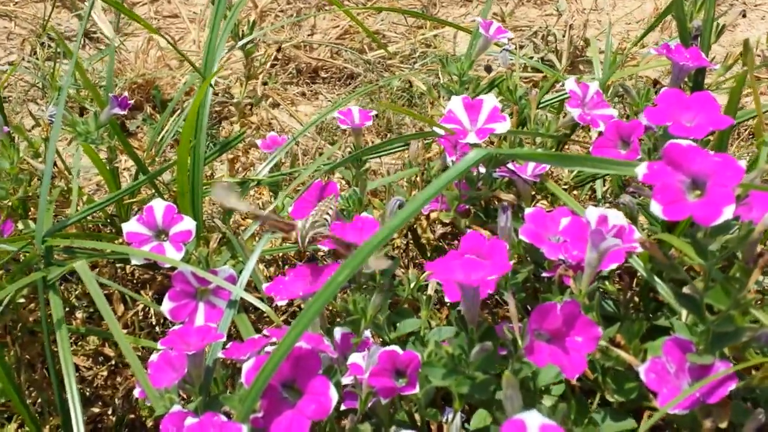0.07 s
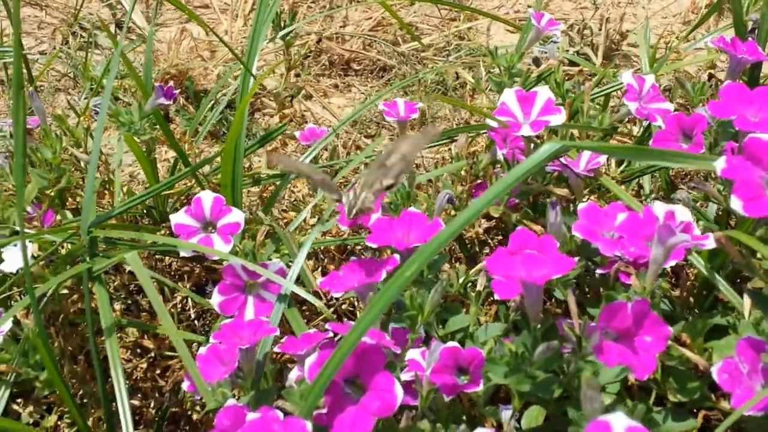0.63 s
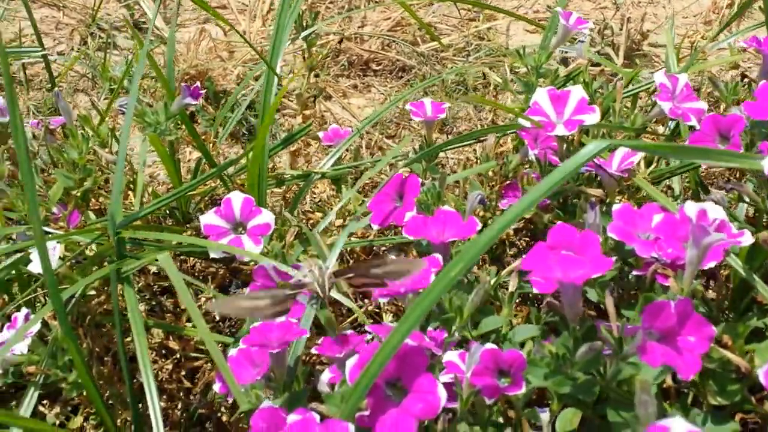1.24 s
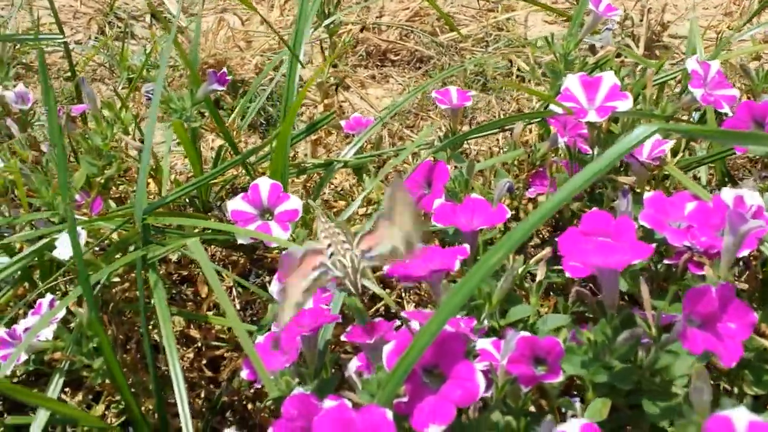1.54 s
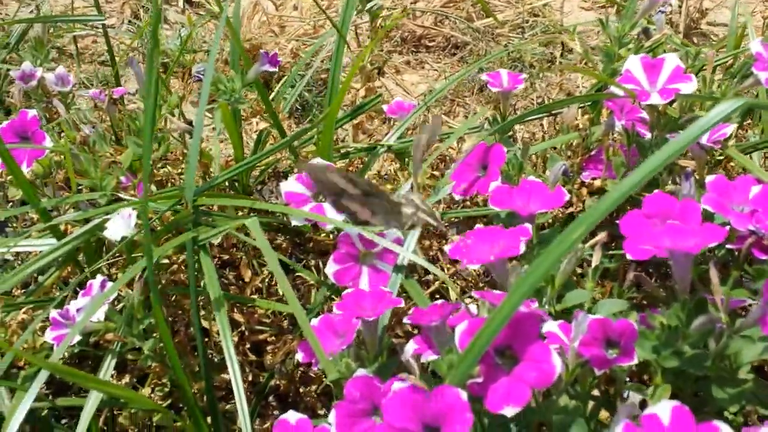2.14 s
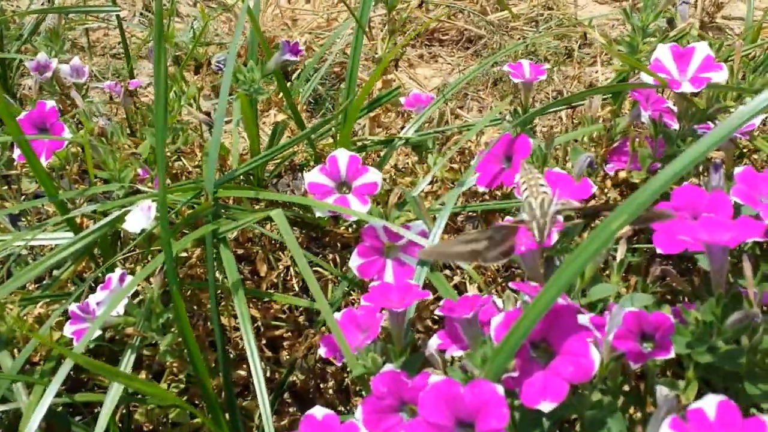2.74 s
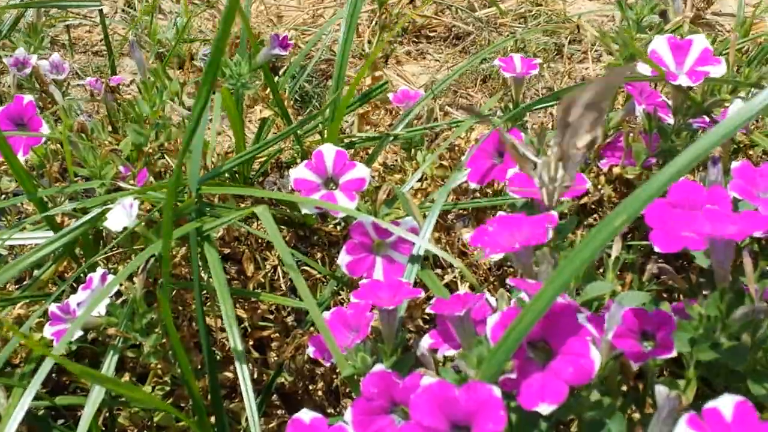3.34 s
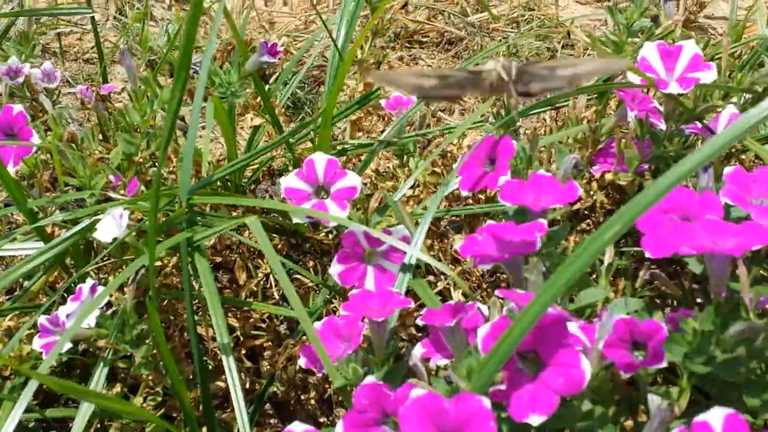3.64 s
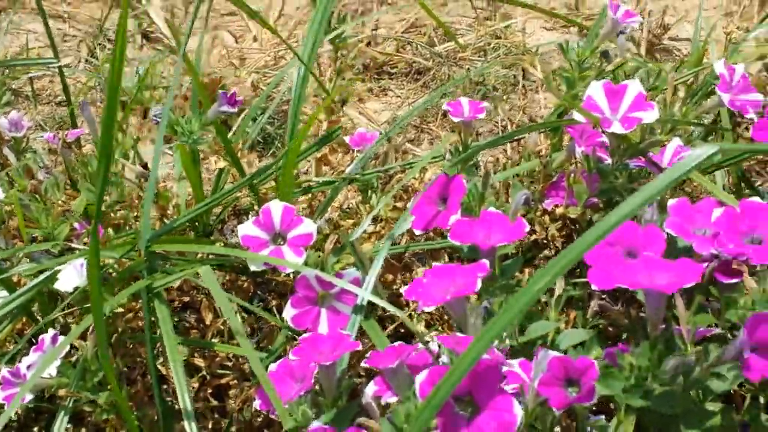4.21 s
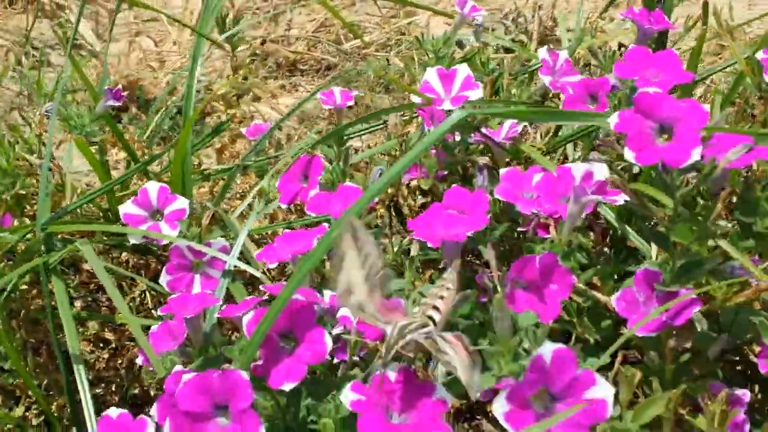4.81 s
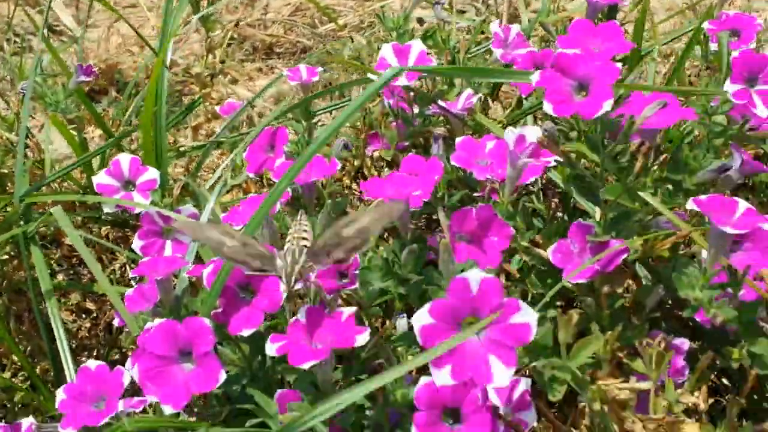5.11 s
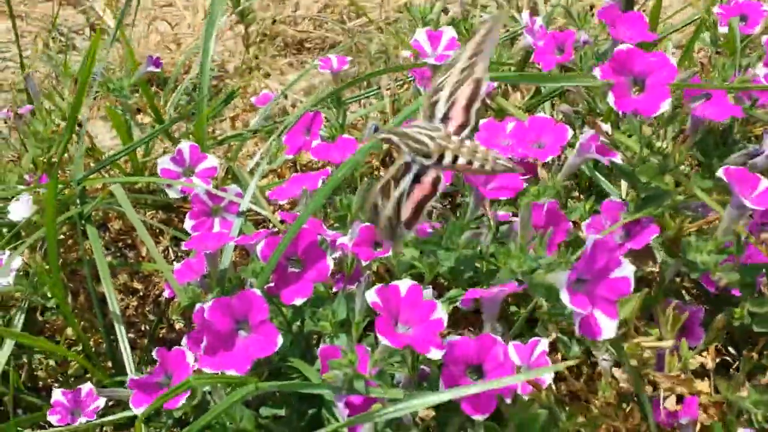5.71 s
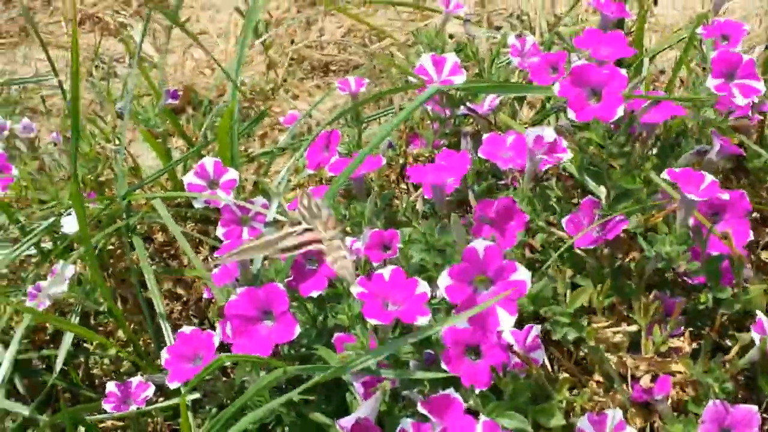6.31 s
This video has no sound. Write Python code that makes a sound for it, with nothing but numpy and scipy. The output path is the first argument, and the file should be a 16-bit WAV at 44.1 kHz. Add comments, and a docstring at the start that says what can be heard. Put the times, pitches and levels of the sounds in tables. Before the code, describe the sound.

A soft breeze and a faint, high hiss of insects in dry grass run throughout, slightly to the left, with a barely audible distant hum. Wind on the hand-held microphone is the loudest sound. It is light at first, then hits suddenly at about 1.3 seconds with low rumbles and thuds that shift between left and right. It dips briefly, returns at 2 seconds and continues in smaller, uneven puffs. From about 4.5 seconds it builds, buffeting hardest between 5.4 and 6 seconds. Tiny dry clicks sound close by, scattered through the first three seconds, with a sharper one near 3.9 seconds. Fingers tap dully on the housing at about 0.9 and 1.7 seconds. The insects swell slightly around 2 and 5 seconds. From about 5.7 seconds a very faint, thin, distant whistle rises on one pitch, fading at the end, near 6.4 seconds.

```python
"""Wind buffets the two ports of a hand-held microphone, each with its own eddies, strongest near the end.
Each eddy is a pressure pulse that the bass roll-off turns into a thud. Insects stridulate in dry grass,
three bands of hiss over a soft breeze and a faint distant hum. Small dry clicks ring close by,
fingers tap the housing twice, and a thin far whistle swells late."""
import sys
import numpy as np
from scipy import signal
from scipy.fft import rfft, irfft, next_fast_len
from scipy.io import wavfile
from scipy.ndimage import uniform_filter1d, map_coordinates

SR = 44100
rng = np.random.default_rng(int(sys.argv[2]) if len(sys.argv) > 2 else 0)


def to_wav(sig):
    """Store sig (one row per channel, or 1-D mono) as 16-bit WAV at the path in sys.argv[1].

    Samples outside -1..1 are clipped; the rate is SR.
    """
    pcm = np.clip(np.atleast_2d(sig), -1, 1) * 32767
    pcm = np.round(pcm).astype(np.int16)
    wavfile.write(sys.argv[1], SR, pcm.T)  # frames by channels


N = 280476


def amp(db):
    """Decibels to gain."""
    return 10 ** (np.asarray(db) / 20)


def unit(x):
    """Each channel at rms 1."""
    return x / np.sqrt(np.mean(x ** 2, axis=-1, keepdims=True) + 1e-20)


def power(x, size=1250):
    """Running mean square."""
    return np.abs(uniform_filter1d(uniform_filter1d(x * x, size), size)) + 1e-12


def pan(left_db):
    """Channel gains for a left-minus-right level."""
    return amp([[left_db / 2], [-left_db / 2]])


def over_hz(points, hz):
    """(f/Hz, value) points interpolated on a log axis."""
    knots_hz, values = np.transpose(points)
    return np.interp(np.log(hz + 1), np.log(knots_hz + 1), values)


def over_time(points):
    """(t/s, value) points interpolated per sample."""
    return np.interp(np.arange(N) / SR, *np.transpose(points))


def wobble(rate_hz):
    """Smooth random curve, rate_hz knots a second."""
    knots = rng.standard_normal(int(N * rate_hz / SR) + 4)
    return map_coordinates(knots, [np.arange(N) * rate_hz / SR])


def filtered(x, response):
    """x through a complex frequency response."""
    size = next_fast_len(N + SR // 2)
    return irfft(rfft(x, size) * response(np.fft.rfftfreq(size, 1 / SR)), size)[..., :N]


def resonances(modes, hz):
    """Causal response of (f/Hz, width/Hz, level/dB) modes, alternating in sign."""
    return sum((-1) ** k * amp(db) * 1j * hz * width / (centre ** 2 - hz ** 2 + 1j * hz * width)
               for k, (centre, width, db) in enumerate(modes))


def hiss(spectrum, patchy_db=1.56):
    """Uncorrelated stereo noise of rms 1, shimmering in small time-frequency patches."""
    cells = signal.stft(rng.standard_normal((2, N)), nperseg=1024)[2]
    patches = uniform_filter1d(rng.standard_normal(cells.shape), size=5, axis=1)
    patches = uniform_filter1d(patches, size=7, axis=2)
    noise = signal.istft(cells * amp(patchy_db * patches / patches.std()), nperseg=1024)[1][:, :N]
    return unit(filtered(noise, lambda hz: amp(over_hz(spectrum, hz))))


def pulses(times_s, peaks, half_widths_ms):
    """Bell-shaped pressure pulses; narrow ones sound brighter."""
    offsets = np.arange(-SR // 40, SR // 40)
    distance = offsets / (np.asarray(half_widths_ms)[:, None] * SR / 1000)
    bells = np.asarray(peaks)[:, None] * np.hanning(len(offsets)) / (1 + distance ** 2)
    at = np.round(np.asarray(times_s)[:, None] * SR).astype(int) + offsets
    inside = (at >= 0) & (at < N)
    return np.bincount(at[inside], bells[inside], N)


def low_cut(x, corner_hz=92, damping=1.0, blocking_hz=38):
    """Microphone bass roll-off: each push becomes a swing and a rebound."""
    def response(hz):
        s = 1j * hz / corner_hz
        return s * s / (s * s + damping * s + 1) * 1j * hz / (1j * hz + blocking_hz)
    return filtered(x, response)


# Wind rumble before the port offset: t/s, level/dB
WIND_DB = [(0, -51.5), (.25, -40.5), (.7, -45), (1.22, -48), (1.28, -24.5), (1.58, -31), (1.87, -45),
           (1.97, -26), (2.55, -33), (3.1, -33.5), (3.38, -35), (3.8, -37), (4.1, -32.5), (4.7, -26.5),
           (5.2, -21.5), (5.9, -19.5), (6.03, -23.5), (6.36, -25)]
# Port offset, left in the lee: port -> gain/dB
PORT_DB = {"L": -9, "R": 1}
# Air stalls at both ports: t/s, half length/s, drop/dB
WIND_LULLS = [(3.18, 0.02, 7), (3.375, .04, 10), (3.952, 0.014, 5), (4.888, 0.009, 16), (5.611, 0.019, 8.5),
              (6.17, 0.03, 1.5)]
# Puffs at one port: start t/s, port, hold/s, level/dB
WIND_PUFFS = [(0.28, "L", 0.1, -39), (0.446, "L", 0.016, -29.5), (1.258, "R", 0.058, -18.5),
              (1.274, "L", .12, -21.5), (1.447, "L", 0.018, -20.5), (1.529, "L", 0.11, -19),
              (1.958, "R", .04, -22), (2.092, "L", 0.02, -19), (2.187, "R", 0.017, -19.5),
              (2.334, "R", 0.085, -26), (2.436, "L", 0.062, -26.5), (2.571, "L", 0.17, -30.5),
              (2.678, "R", 0.035, -25), (2.97, "R", 0.12, -27.5), (3.06, "L", 0.1, -32.5),
              (3.292, "R", 0.043, -30), (3.46, "R", 0.023, -28), (3.479, "L", 0.098, -31.5),
              (3.69, "R", 0.063, -30), (3.853, "R", 0.078, -22), (3.99, "L", .14, -29.5),
              (4.204, "L", 0.027, -25.5), (4.303, "L", 0.13, -33.5), (4.472, "R", 0.034, -23.5),
              (4.682, "L", 0.058, -17), (4.809, "R", 0.049, -15.5), (4.913, "L", 0.031, -28),
              (5.217, "L", 0.048, -19.5), (5.375, "L", 0.066, -23), (5.445, "L", .115, -15.5),
              (5.643, "R", 0.18, -15.5), (5.668, "L", .145, -16), (5.853, "L", 0.058, -12),
              (5.927, "L", 0.082, -18.5), (6.241, "L", 0.039, -17)]

def airflow_db(port, flutter_db=2.5, flutter_hz=30, attack_s=0.019, release_s=0.026):
    """Rumble level at one port: fluttering wind with lulls, overtaken by puffs."""
    t = np.arange(N) / SR
    lull_db = sum(drop_db / (1 + ((t - at_s) / half_s) ** 4) for at_s, half_s, drop_db in WIND_LULLS)
    level_db = over_time(WIND_DB) + PORT_DB[port] + flutter_db * wobble(flutter_hz) - lull_db
    for start_s, side, hold_s, puff_db in WIND_PUFFS:
        if side == port:
            outside = np.maximum((start_s - t) / attack_s, (t - start_s - hold_s) / release_s)
            level_db = np.maximum(level_db, puff_db - 20 * np.maximum(outside, 0))
    return level_db


def turbulence(level_db, buffets, rate_hz=420, half_ms=2.546, narrowing=0.033, scatter=0.21, calm_db=-30):
    """Random eddies: faster air makes them stronger and shorter."""
    count = int(rate_hz * N / SR)
    jitter, spread, peaks = rng.standard_normal((count, 3)).T
    times_s = np.clip((np.arange(count) + jitter) / rate_hz, 0, (N - 1) / SR)
    speed_db = np.maximum(level_db[(times_s * SR).astype(int)] - calm_db, -7)
    half_widths_ms = half_ms * np.exp(scatter * spread - narrowing * speed_db)
    stream = low_cut(pulses(times_s, peaks, half_widths_ms))
    gust_power = amp(level_db) ** 2
    stream_power = np.maximum(gust_power - power(buffets), 0.5 * gust_power)
    return stream * np.sqrt(stream_power / power(stream))


# Hardest eddies: t/s, port, level/dB before the low cut, half width/ms
HARD_EDDIES = [(1.275, "R", -7.5, 0.78), (1.294, "L", -0.5, 2.3), (1.33, "R", -12.5, 0.81),
               (1.359, "L", -7, 1.27), (1.423, "R", -11.5, 0.85), (1.55, "L", -0.5, 2.3),
               (1.617, "L", -4.5, 0.9), (1.983, "R", -13, 0.89), (2.098, "L", 3, 5.1),
               (2.188, "R", -7.5, 1.14), (2.337, "R", -14, 1.27), (2.46, "L", -9.5, 1.36),
               (2.688, "R", -11.5, 1.6), (3.882, "R", -8.5, 0.93), (4.486, "R", -9.5, .96),
               (4.678, "L", 1, 2.1), (4.837, "R", 2, 2.7), (5.111, "R", -3, 1.06), (5.252, "R", -2, 0.79),
               (5.286, "R", -11, 0.78), (5.450, "L", 1.5, 1.2), (5.462, "L", 0.5, 1), (5.494, "L", 1, 0.98),
               (5.667, "L", -0.5, 1.07), (5.754, "L", -2, 1.02), (5.860, "L", 1, 0.69),
               (5.891, "L", 1.5, 0.81), (5.991, "L", -0.5, 1.2), (6.210, "R", -8, 0.79)]

def wind(port):
    """Hard eddies thud on one port amid the smaller turbulence."""
    rows = [(at_s, db, half_ms) for at_s, side, db, half_ms in HARD_EDDIES if side == port]
    times_s, levels_db, half_widths_ms = np.transpose(rows)
    buffets = low_cut(pulses(times_s, -amp(levels_db), half_widths_ms))
    return buffets + turbulence(airflow_db(port), buffets)


# Effort of the whole chorus: t/s, gain/dB
EFFORT_DB = [(0, 0), (.3, 2.5), (.85, 1.5), (1.15, -2.5), (1.42, 2.5), (1.8, 0.5), (3.2, 1.5), (3.5, 0),
             (4.2, 1), (5.65, 0.5), (5.85, -0.5), (6.36, 1)]
# One voice rises: t/s, voice, half length/s, rise/dB
VOICE_SWELLS = [(1.532, "sizzle", 0.21, 3), (2.174, "sizzle", 0.13, 6), (2.99, "shrill", 0.057, 3.5),
                (3.255, "shrill", .08, 4.5), (4.16, "sizzle", 0.067, 2.5), (4.838, "shrill", 0.11, 8.5),
                (5.0, "rasp", 0.85, 3), (5.215, "shrill", 0.1, 5), (5.61, "shrill", 0.15, 5)]

def stridulation(voice, level_db, flutter_hz, flutter_db=1.0, drift_db=-0.4, drift_hz=4.6):
    """Gain of one insect voice: shared effort, own swells, drift and flutter."""
    t = np.arange(N) / SR
    swell_db = sum(rise_db * np.exp(-((t - at_s) / half_s) ** 2)
                   for at_s, who, half_s, rise_db in VOICE_SWELLS if who == voice)
    waver_db = drift_db * wobble(drift_hz) + flutter_db * wobble(flutter_hz)
    return amp(level_db + over_time(EFFORT_DB) + swell_db + waver_db)


# Insect voice spectra: f/Hz, relative level/dB
SHRILL_SPECTRUM = [(4000, -28), (4500, -9), (4850, -8), (5200, -1.5), (5480, -2.5), (5700, -6), (6300, -10),
                   (7500, -49), (9000, -28)]
SIZZLE_SPECTRUM = [(4500, -33), (5700, -4), (6400, 0.5), (7100, 2), (8200, -8.5), (9700, -6.5),
                   (12000, -20), (15000, -35)]
RASP_SPECTRUM = [(2600, -20.5), (3050, -6), (3330, 2), (3550, -2.5), (3700, 0), (3950, 0), (4200, -5.5),
                 (4550, -8), (5200, -19), (6500, -65)]

def insects():
    """Many far insects blur into three noise bands, the shrill one furthest left."""
    shrill = stridulation("shrill", level_db=-58.5, flutter_hz=40) * hiss(SHRILL_SPECTRUM, patchy_db=2.0)
    sizzle = stridulation("sizzle", level_db=-60.5, flutter_hz=28) * hiss(SIZZLE_SPECTRUM, patchy_db=1.0)
    rasp = stridulation("rasp", level_db=-62.5, flutter_hz=35) * hiss(RASP_SPECTRUM, patchy_db=2.5)
    return shrill * pan(left_db=9.0) + sizzle * pan(left_db=4.5) + rasp * pan(left_db=3.5)


# Open-air spectrum: f/Hz, relative level/dB
BREEZE_SPECTRUM = [(20, -3), (75, -0.5), (170, -2), (230, -3), (330, -8), (450, -13.5), (720, -13),
                   (1100, -15.5), (1500, -19), (2700, -20), (6000, -16), (9500, -22.5), (12000, -25.5),
                   (14500, -29)]
# Left-right likeness: f/Hz, correlation
BREEZE_CORRELATION = [(60, 0.54), (290, 0.99), (640, 0.57), (1400, 0), (15000, 0)]
# Balance: f/Hz, left minus right/dB
BREEZE_BALANCE = [(300, 2), (1500, 2.5), (9000, -1.5), (12000, -4)]
# Slow swell: t/s, gain/dB
BREEZE_SWELL = [(0, -2), (1.3, -1), (2.2, 0.5), (4.2, 0.5), (5, 2), (5.7, 2), (6.36, 1.5)]

def breeze(level_db=-51.0):
    """Open air, alike at both ports in the bass, diffuse in the treble."""
    def mid_side_gains(hz):
        angle = np.arccos(np.clip(over_hz(BREEZE_CORRELATION, hz), -1, 1)) / 2
        return np.array([np.cos(angle), np.sin(angle)])
    mid, side = filtered(hiss(BREEZE_SPECTRUM), mid_side_gains)
    stereo = unit(np.array([mid + side, mid - side]))
    stereo = filtered(stereo, lambda hz: amp(np.outer([.5, -.5], over_hz(BREEZE_BALANCE, hz))))
    return amp(level_db + over_time(BREEZE_SWELL)) * stereo


# Far drone: f/Hz, resonator width/Hz, level/dB
HUM_BANDS = [(303, 49, -66.5), (834.5, 12, -73.5)]

def hum(swing_db=-1.0, swing_hz=4.2):
    """Narrow noise bands of a far drone, wavering on the breeze."""
    drone = np.zeros(N)
    for centre_hz, width_hz, level_db in HUM_BANDS:
        gain = amp(level_db + swing_db * wobble(swing_hz))
        band = filtered(rng.standard_normal(N), lambda hz: resonances([(centre_hz, width_hz, 0)], hz) ** 2)
        drone += gain * unit(band)
    return drone * pan(left_db=1.5)


# Dry snaps: t/s, relative level/dB, 30 dB decay/s, ring f/Hz, low mode gain/dB
SNAPS = [(.125, -44, 0.0071, 5600, -10), (0.619, -46, 0.0041, 5800, -6), (.852, -41, .0056, 5670, -22),
         (1.037, -45, 0.0055, 6300, -26), (1.548, -56, 0.0029, 5000, 13.5), (1.872, -45, 0.0046, 5960, -20),
         (2.019, -39, 0.012, 6360, -4), (2.647, -37.5, 0.012, 5100, -18),
         (3.8882, -30.5, 0.0034, 5900, -11)]
# Body modes: ratio to ring frequency, width/Hz, level/dB
RING_MODES = [(1, 704, -2), (1.22, 900, -5.5), (1.53, 1800, -14), (2.25, 1800, -13)]
# Low resonator, applied twice: f/Hz, width/Hz, level/dB
LOW_MODE = [(1920, 750, 1.5)]

def clicks(gain_db=9, tail_db=-24, tail_t60_s=0.07, edge_db=-17, size=4096):
    """Milliseconds of crackle ring a small hard body and leave a faint tail."""
    out = np.zeros((2, N + size))
    t, hz = np.arange(size) / SR, np.fft.rfftfreq(size, 1 / SR)
    for at_s, level_db, decay_s, ring_hz, low_db in SNAPS:
        crackle = rng.standard_normal(size) + 0.5 * rng.standard_normal((2, size))
        envelope = amp(-30 * t / decay_s) + amp(tail_db - 60 * t / tail_t60_s)
        modes = [(ring_hz * ratio, width_hz, db) for ratio, width_hz, db in RING_MODES]
        body = resonances(modes, hz) - amp(low_db) * resonances(LOW_MODE, hz) ** 2
        edge = amp(edge_db) * 1j * hz / (1j * hz + ring_hz)  # bare crackle, high-passed
        snap = irfft(rfft(envelope * crackle) * (body + edge))
        start = round(at_s * SR)
        out[:, start:start + size] += amp(level_db + gain_db) * snap
    return out[:, :N] * pan(left_db=6.5)


# Taps on the housing: t/s, level/dB before low cut and pan, half width/ms
FINGER_TAPS = [(0.918, -38.5, 0.16), (1.736, -28.5, 0.18)]

def finger_taps():
    """Short dull knocks reach both ports through the housing."""
    times_s, levels_db, half_widths_ms = np.transpose(FINGER_TAPS)
    return low_cut(pulses(times_s, -amp(levels_db), half_widths_ms)) * pan(left_db=12)


# Whistle swell: t/s, rms level/dB
WHISTLE_DB = [(5.6, -101), (5.74, -66), (5.95, -62), (6.15, -59.5), (6.27, -61.5), (6.36, -72)]

def whistle(pitch_hz=1271, drift_hz=1.0, drift_rate_hz=28):
    """A faint far squeal on one slightly unsteady pitch."""
    started = np.arange(N) / SR > WHISTLE_DB[0][0]
    envelope = np.sqrt(2) * amp(over_time(WHISTLE_DB)) * started
    phase = 2 * np.pi * np.cumsum(pitch_hz + drift_hz * wobble(drift_rate_hz)) / SR
    return envelope * np.sin(phase) * pan(left_db=3.0)


def scene():
    """Wind on both ports over a quiet garden."""
    gusts = np.array([wind("L"), wind("R")])
    return gusts + insects() + breeze() + hum() + clicks() + finger_taps() + whistle()


def record(dry, top_hz=14650):
    """Brick-wall band limit."""
    return filtered(dry, lambda hz: hz < top_hz)


dry = scene()
out = record(dry)
to_wav(out)
```